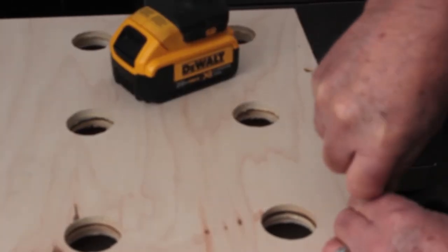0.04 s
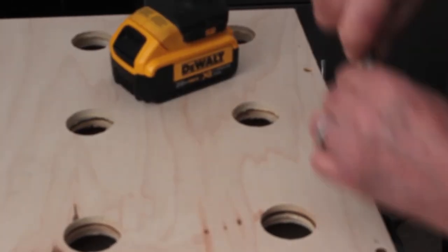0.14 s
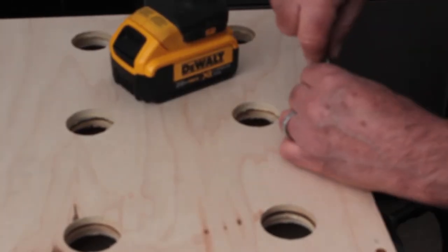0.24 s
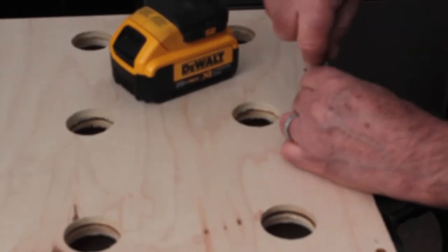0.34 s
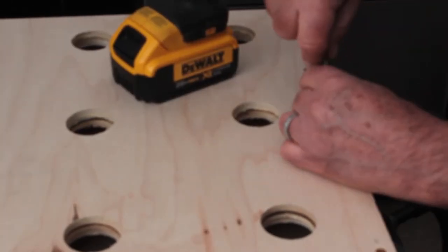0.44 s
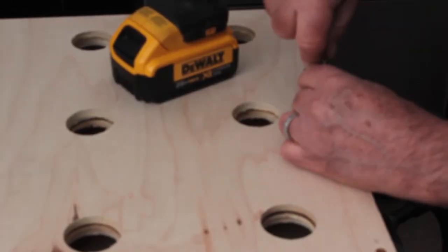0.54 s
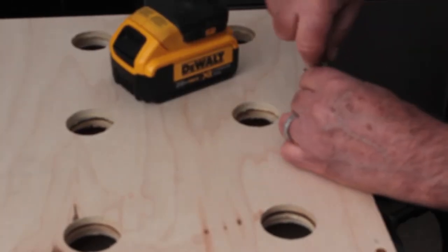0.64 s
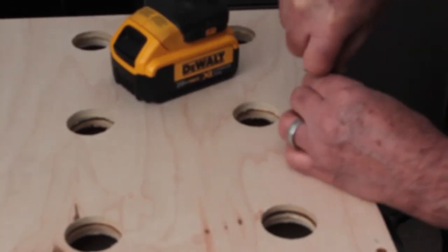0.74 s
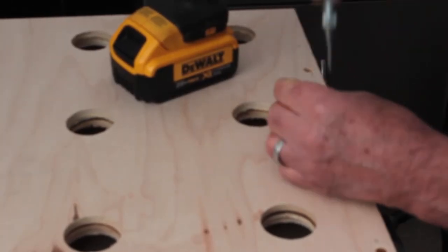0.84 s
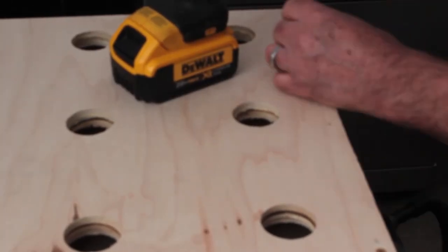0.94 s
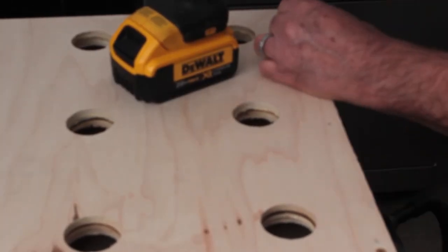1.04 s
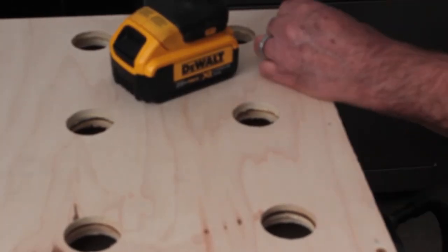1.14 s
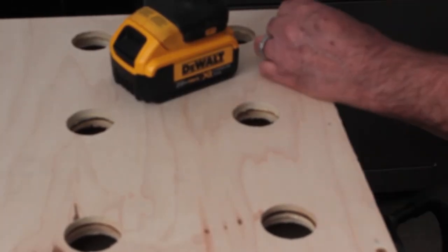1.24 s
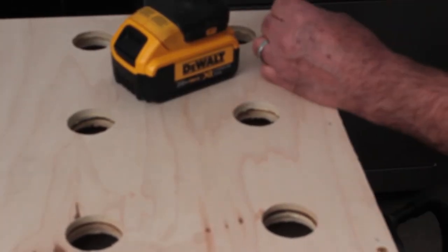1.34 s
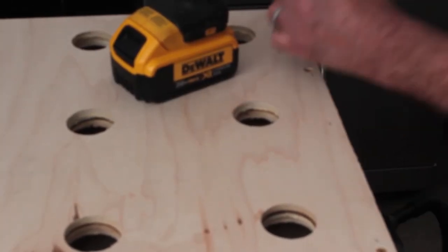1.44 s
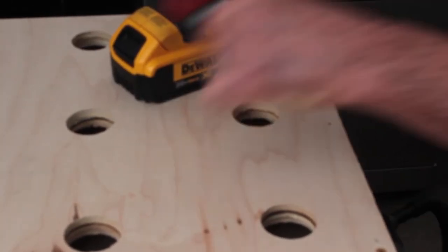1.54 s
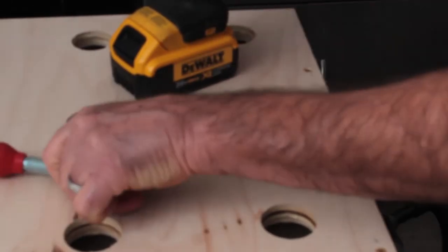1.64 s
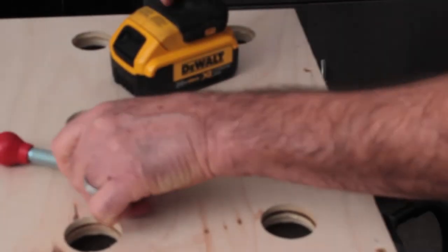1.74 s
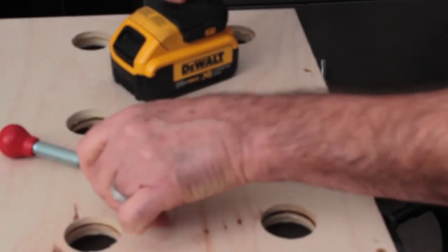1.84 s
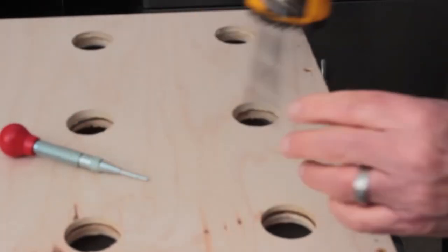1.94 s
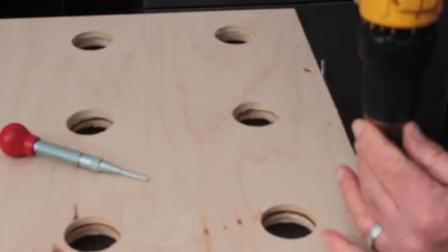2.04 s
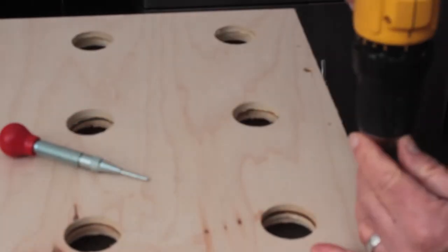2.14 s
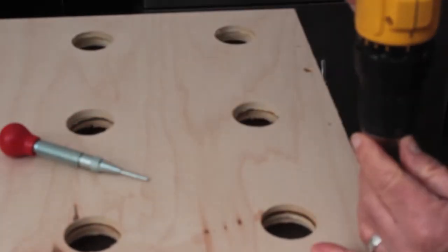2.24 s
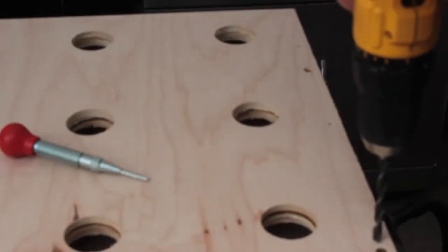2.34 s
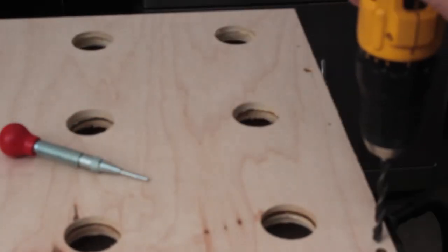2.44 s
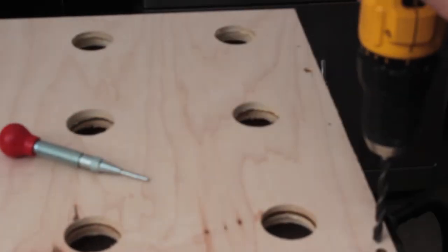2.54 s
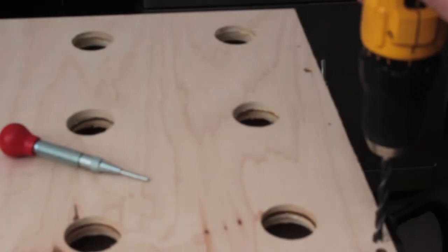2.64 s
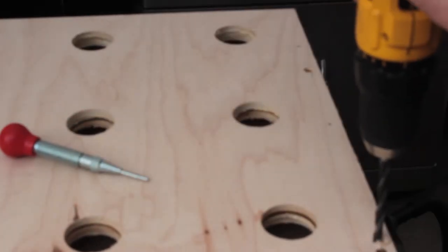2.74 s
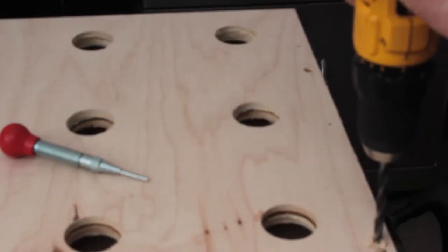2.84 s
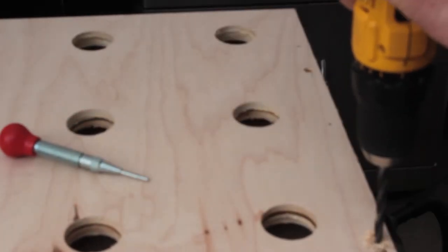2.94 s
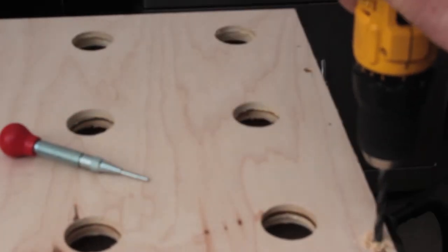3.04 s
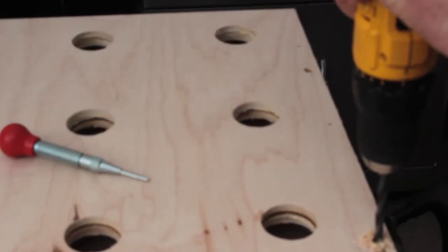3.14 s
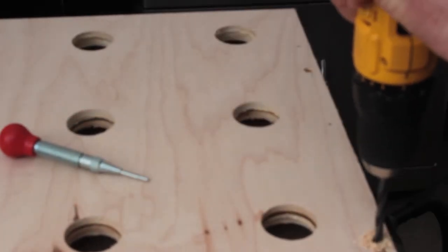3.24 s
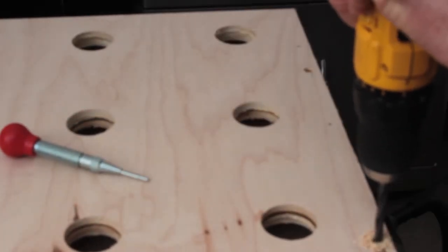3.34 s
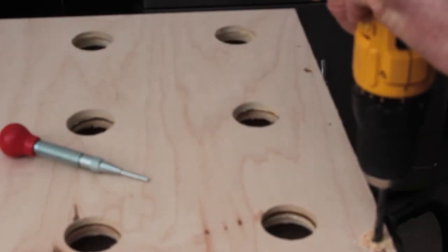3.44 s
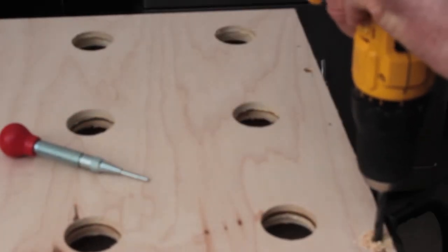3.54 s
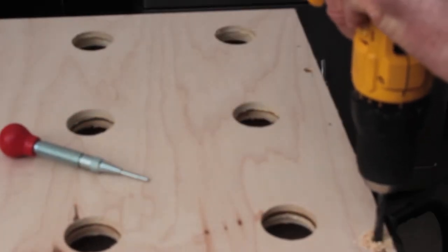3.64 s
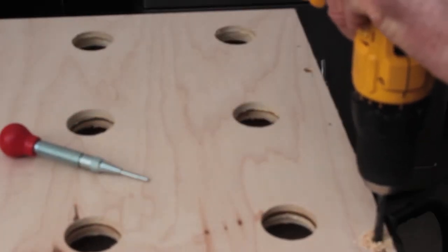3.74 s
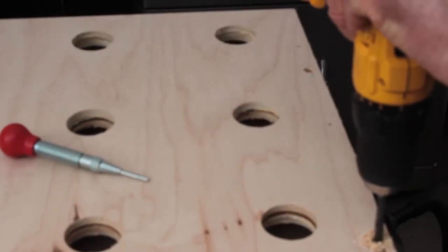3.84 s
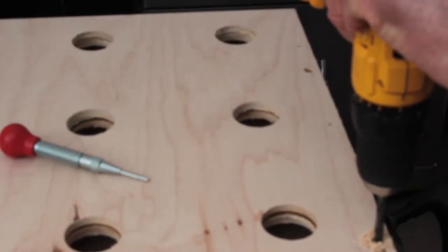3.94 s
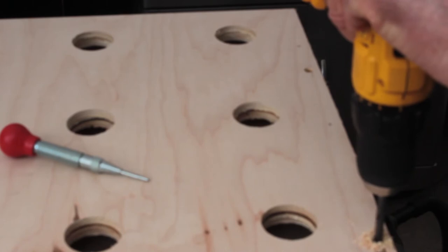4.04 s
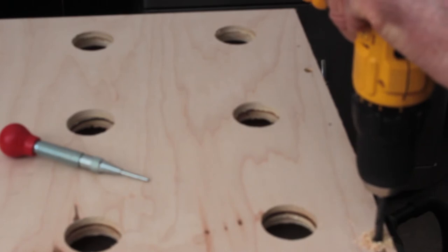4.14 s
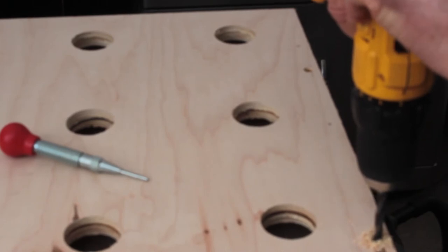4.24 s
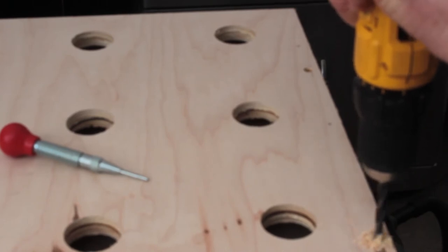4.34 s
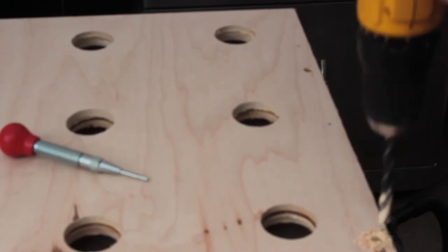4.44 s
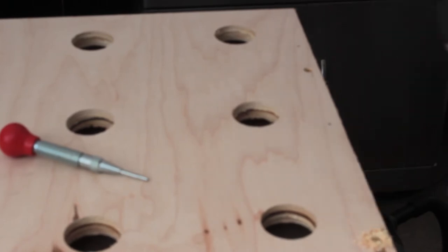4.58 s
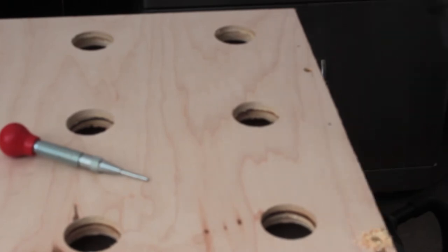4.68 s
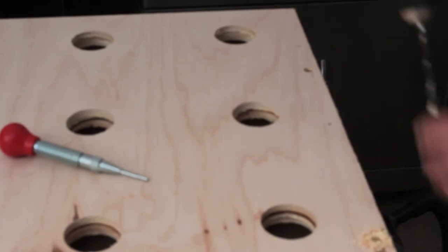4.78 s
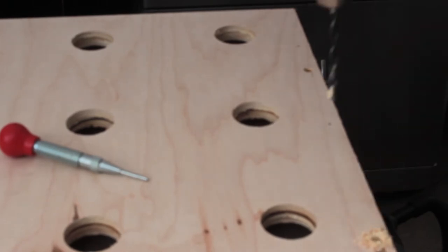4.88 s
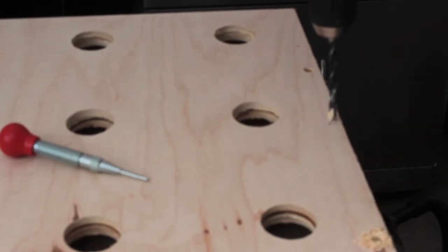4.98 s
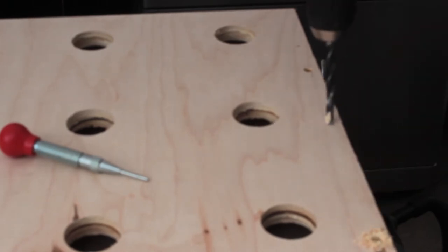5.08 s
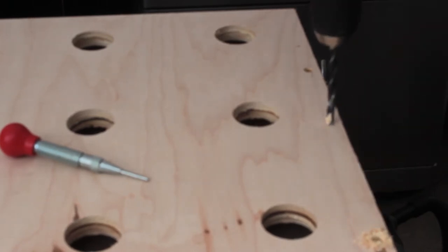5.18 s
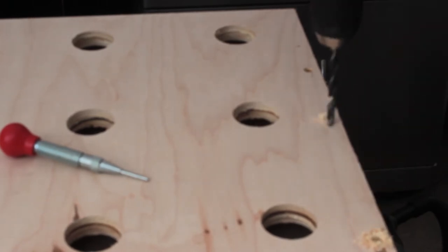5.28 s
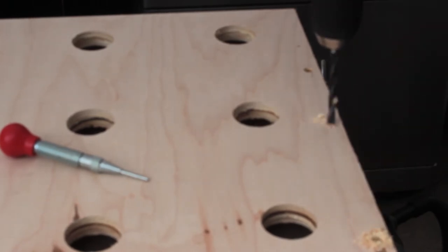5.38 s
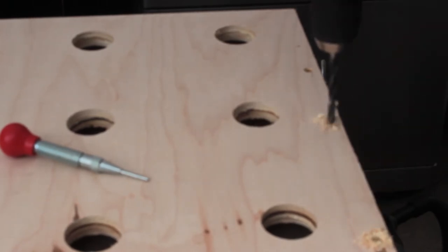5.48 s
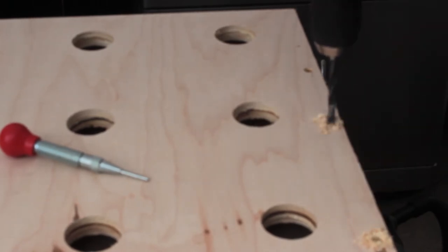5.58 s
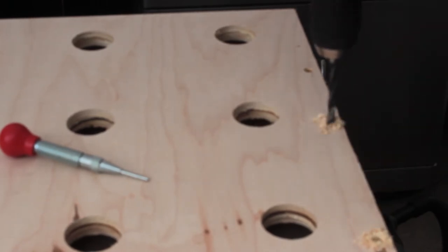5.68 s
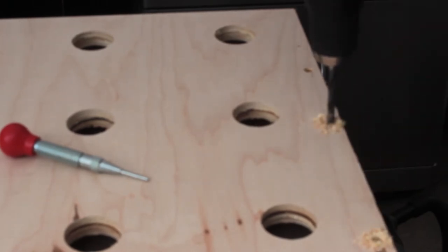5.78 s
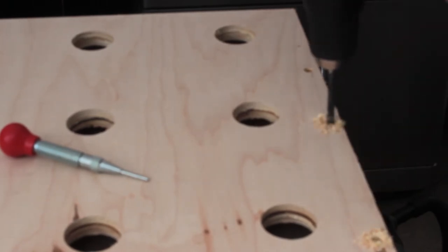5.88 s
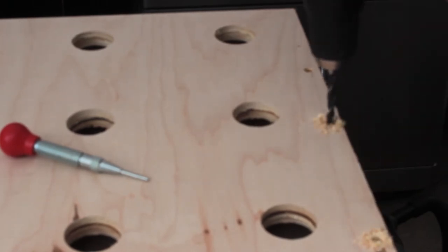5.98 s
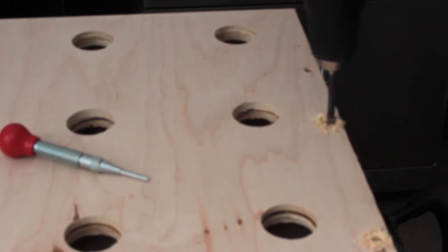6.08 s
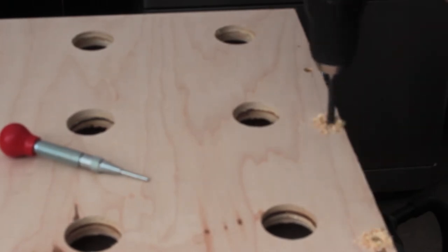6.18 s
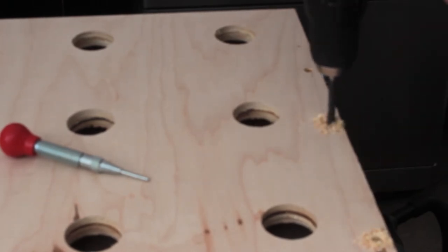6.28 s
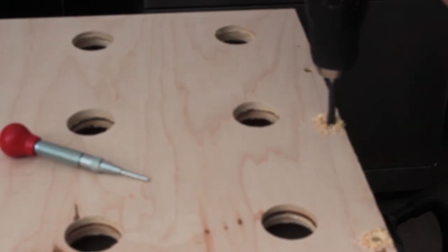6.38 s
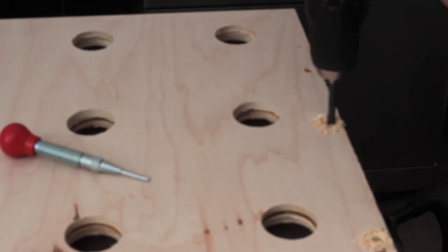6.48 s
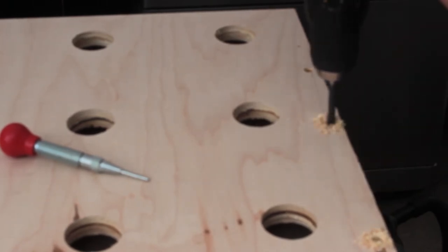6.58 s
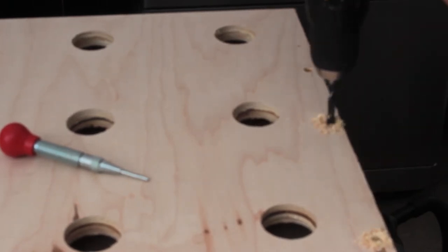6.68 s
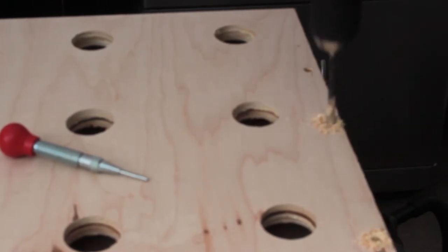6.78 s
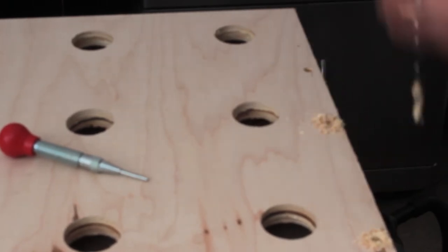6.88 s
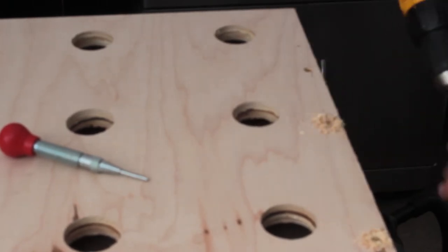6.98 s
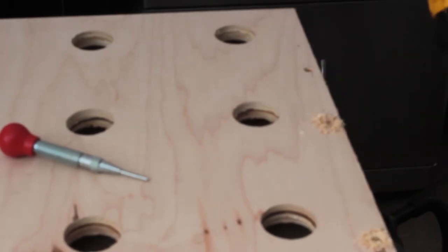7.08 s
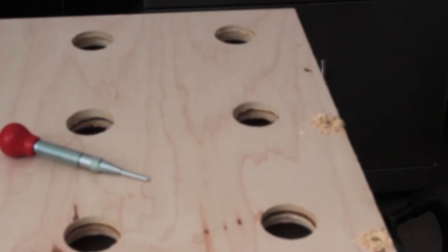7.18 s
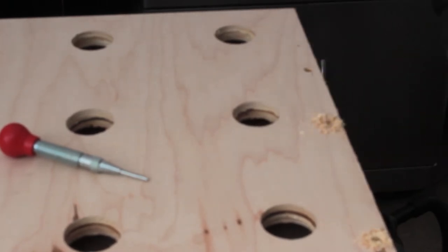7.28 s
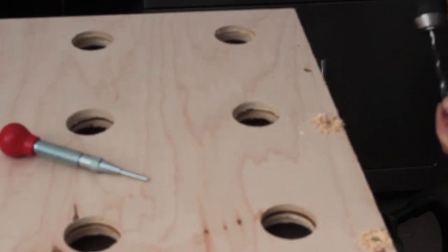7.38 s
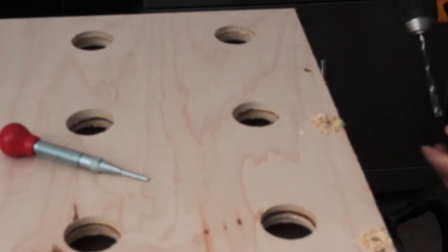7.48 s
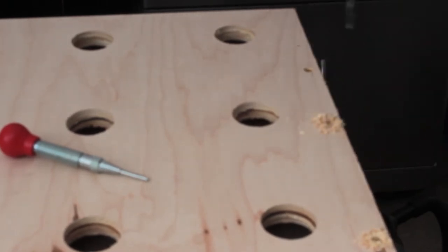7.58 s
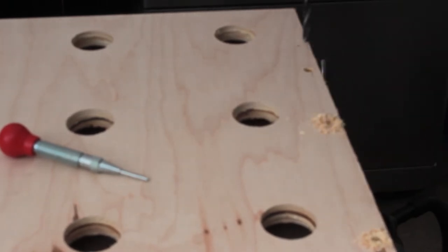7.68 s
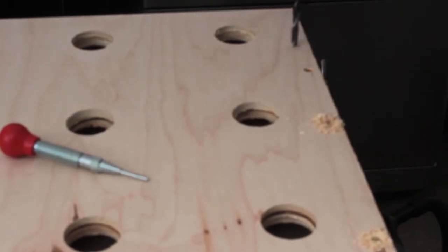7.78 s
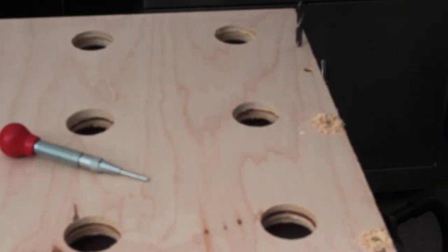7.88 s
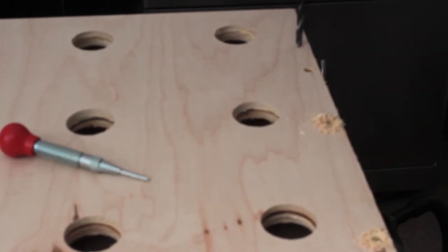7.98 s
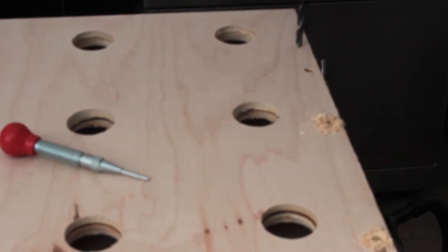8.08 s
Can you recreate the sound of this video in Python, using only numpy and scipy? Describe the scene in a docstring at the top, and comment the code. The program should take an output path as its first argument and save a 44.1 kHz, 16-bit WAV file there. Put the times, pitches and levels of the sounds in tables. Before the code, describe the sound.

A steel spring punch snaps sharply on a plywood panel at about 0.1, 0.8 and 1.4 seconds, briefly overloading the close mono microphone. Hands shuffle and the spring ticks in between, and a tool knocks down at 1.6 seconds, followed by tiny squeaks. At 2.6 seconds a cordless drill blips, then runs with an uneven whine that climbs high as the bit bites around 3.3 seconds, over growling gears and rasping wood. It winds down near 4.4 seconds with one more blip. After light rubbing and clicks, the drill bores again from 5.3 to 6 seconds and from 6.1 to 6.7, ending with a quick trigger tap. Soft sliding and small knocks continue until about 8 seconds. Underneath lies quiet workshop air and the faint hum of a distant machine slowly running down.

```python
"""In a workshop, a spring punch snaps on a plywood panel, hands shuffle, and a cordless drill bores in
short runs. The motor's commutator (its spinning contact) whines higher the faster it turns, over
growling gears and the noise of the cutting bit. Far off, another machine coasts down. The sharp snaps
overload a close mono microphone, and its limiter briefly turns the room down."""
import sys
import numpy as np
from scipy import signal
from scipy.fft import rfft, irfft, next_fast_len
from scipy.io import wavfile
from scipy.ndimage import uniform_filter1d

SR = 44100
rng = np.random.default_rng(int(sys.argv[2]) if len(sys.argv) > 2 else 0)


def persist_wave(psi):
    """Save psi, clipped to +-1, as 16-bit WAV."""
    counts = np.round(np.clip(psi, -1, 1) * 32767).astype(np.int16)
    wavfile.write(sys.argv[1], SR, np.atleast_2d(counts).T)


N = 358091

# Tone colours. Each row: frequency in Hz, relative level in dB.
ROOM_COLOUR = [(47, -57), (80, -37), (413, -8), (461, -4.5), (550, -4.5), (687, -0.5), (820, -4.5),
               (1070, -2.5), (4330, -9), (8050, -19), (15000, -24), (16000, -18.5)]  # the air of the shop
CRACK_COLOUR = [(180, -31), (300, -37.5), (2480, -2), (4370, -2), (6000, 0.5), (7820, -0.5), (8500, -2),
                (10900, -6), (14200, -2), (16000, 3.5)]  # struck steel
PANEL_COLOUR = [(115, -39), (150, -28), (200, -38.5), (500, -33.5), (850, -2.5), (1200, -2.5), (1500, -6.5),
                (2000, -14.5), (2700, -4.5), (3200, -17)]  # the plywood
CUTTING_COLOUR = [(180, -79), (300, -28), (440, -86), (519, -22), (870, -12), (961, -8.5), (2100, -8),
                  (2610, -7.5), (5250, -1), (7320, -4), (13300, 1), (14500, -1), (15500, -1),
                  (16000, -12.5)]  # the bit in the wood
SHELL_COLOUR = [(2000, -25), (4000, -34.5), (6000, -11.5), (8000, -11), (11500, -1.5), (15500, -2)]  # how the drill's shell gives off the whine
PINION_COLOUR = [(1500, -17), (2200, -11), (2700, -19), (3300, -27), (4200, -16), (4900, -12), (5500, -23)]  # how the case gives off the small motor gear's tone
RUB_COLOUR = [(300, -29.5), (800, 4.5), (1800, -1), (3000, -1.5), (5500, -3), (8000, -18.5)]
HISS_COLOUR = [(5000, -18), (7500, -1.5), (11500, -4.5), (15500, -6.0)]

# The far machine slows. Each row: time in seconds, base pitch in Hz.
COAST_SPEED = [(0, 234.3), (1.5, 229.1), (4.598, 218.5), (8.12, 200.9)]
# Its hum. Each row: multiple of the base pitch, level in dB.
COAST_TONES = [(2, -65), (3, -54), (4, -66), (5, -66), (6, -58), (8, -58), (9, -56), (10, -65), (12, -62)]
# Hands and tools slide. Each row: start, rise and fall in seconds, body and hiss levels in dB,
# hiss centre in Hz, steel ring in dB compared with the body.
RUB_STROKES = [(0.0, .003, 0.042, -37.5, -29, 9450, -2), (0.019, 0.076, 0.017, -51, -37, 11400, -12),
               (0.2, .1, .035, -38, -27, 9200, -2), (0.6, 0.027, .1, -45.5, -49, 7200, 6.5),
               (0.7, 0.056, 0.052, -40, -33, 8400, 6.5), (0.95, 0.029, 0.17, -37.5, -29, 11200, -28),
               (1.275, 0.11, .01, -38.5, -29.5, 10300, -19), (1.529, .06, 0.13, -41.5, -35.5, 11600, -14),
               (1.87, 0.039, 0.2, -43, -58, 7600, -5), (2.301, .19, 0.02, -64, -39, 9400, -8),
               (4.33, 0.05, 0.044, -40, -34, 8960, -12), (4.5, 0.023, 0.24, -45.5, -42, 8670, -24),
               (4.7, 0.17, 0.18, -48.5, -48, 10100, -18), (5.0, 0.21, 0.11, -50, -49, 8700, -7),
               (5.35, 0.036, .02, -37.5, -64, 9000, -7), (6.69, 0.031, 0.047, -40, -45, 9040, -14),
               (6.87, 0.14, 0.23, -35.5, -34, 10930, -29), (7.1, 0.22, 0.45, -43, -46, 9500, -20),
               (7.44, 0.042, 0.019, -37, -26.5, 10700, -3), (7.449, 0.068, 0.67, -44.5, -52, 9300, -6),
               (7.95, 0.14, .1, -46, -48, 10200, -21)]
# Thin squeaks. Each row: start and length in seconds, first and last pitch in Hz, level in dB.
SQUEAK_GLIDES = [(0.96, 0.08, 1440, 1590, -43), (1.955, 0.034, 3480, 3500, -40),
                 (1.96, 0.045, 2500, 2470, -37), (1.96, 0.125, 2260, 2180, -43),
                 (2.095, 0.031, 2240, 2170, -41), (4.493, 0.21, 1330, 1395, -47),
                 (4.727, .23, 1278, 1417, -42.5), (7.26, 0.183, 1840, 1840, -49)]
# Tool, chuck, trigger and panel tick. Each row: start in seconds, level in dB, ring pitch in Hz,
# noise in dB compared with the ring.
SMALL_KNOCKS = [(0.051, -14, 5570, -1.5), (0.0723, -13.5, 12700, 2.5), (0.267, -18, 3970, -13),
                (0.2893, -9, 1834, 3.5), (0.2946, -11, 1860, 5.5), (0.381, -24, 4070, -2.5),
                (0.845, -13, 8420, 5), (0.854, -8, 11800, 13), (0.8669, -9, 6200, 14.5),
                (1.1508, -19.5, 2050, -6), (1.2268, -27, 1760, 1.5), (1.284, -24, 2000, 3.5),
                (1.337, -16, 1990, 2), (1.45, -22, 6120, 4), (1.4633, -16.5, 6700, 11.5),
                (1.4823, -15, 1970, 4), (1.905, -23.5, 2480, 0.5), (2.21, -34, 7550, 0),
                (2.28, -36, 7000, 2), (2.631, -33, 9050, 1), (2.646, -21, 5200, 10),
                (3.0651, -16, 5230, 12.5), (3.115, -14, 5220, 13), (4.4926, -17, 12200, 7.5),
                (5.0464, -16, 1058, -16), (5.1914, -35, 943, 15.5), (5.299, -22, 5714, 10),
                (5.4129, -4.5, 12200, -3.5), (5.529, -6, 6540, 2), (5.576, -2.5, 6170, 6),
                (5.74, -5, 6000, 5), (6.097, -1.5, 6094, -11), (6.7537, -22, 6830, 10.5),
                (6.983, -24, 1863, 6), (7.0682, -20, 1050, -8), (7.095, -18.5, 880, -10),
                (7.4673, -25, 6560, 8), (7.7877, -22, 1000, -16), (7.841, -18.5, 2310, -10),
                (7.842, -10, 1060, -18), (7.9369, -19.5, 2000, -11), (7.9537, -21, 1960, -14)]
# The punch's steel rings. Each row: pitch in Hz, width in Hz, level in dB.
PUNCH_RINGS = [(2210, 330, -2.5), (3000, 640, -5.5), (4245, 780, -6), (6220, 700, -6.5),
               (7100, 1100, -10.5)]
# Its spring slips. Each row: start in seconds, number of slips, gap in seconds, first and last level in dB.
SPRING_PRESSES = [(0.713, 6, .0134, -25.5, -15), (1.298, 6, .0152, -41, -27.5)]
# The punch fires and the tool is put down. Each row: start in seconds, level in dB, seconds for the crack
# to fade by 60 dB, thud in dB, ring pitch in Hz, panel in dB. Thud and panel are compared with the crack.
SNAP_HITS = [(0.106, 8, 0.013, -61, 13100, -34), (0.802, 12, 0.012, -17.5, 8500, -9.5),
             (1.404, 7.5, 0.017, -11, 9800, -23), (1.639, -1, 0.023, -10.5, 5800, -6.5),
             (1.656, -1.5, 0.025, -16, 5900, -2.5), (6.849, -13, 0.029, -19, 11480, -46)]

# Short trigger taps. Each row: start, rise and fall in seconds, top whine pitch in Hz,
# then whine, cutting and growl levels in dB.
TRIGGER_TAPS = [(2.632, 0.038, 0.036, 6400, -18.5, -27.5, -32),
                (4.386, .044, 0.068, 6760, -24.5, -32.5, -43), (5.29, .028, .035, 7937, -32, -27.5, -38),
                (6.75, 0.047, 0.068, 7800, -26, -29, -35)]
# One list for each long trigger pull. Each row: time in seconds, whine pitch in Hz, whine level in dB.
LONG_PULLS = [
    [(2.766, 4150, -36), (2.828, 5347, -19), (2.872, 3950, -13), (2.915, 5610, -19), (2.965, 4120, -14),
     (2.991, 4920, -11), (2.999, 6180, -23), (3.045, 8690, -15), (3.075, 7920, -20), (3.105, 8170, -26),
     (3.2, 7060, -23), (3.27, 8400, -24.5), (3.36, 12340, -13.5), (3.392, 10230, -12), (3.45, 10860, -14),
     (3.58, 11480, -15), (3.78, 12240, -17.5), (3.96, 12720, -24), (4.09, 12620, -26), (4.16, 12830, -24),
     (4.225, 12750, -30), (4.255, 11940, -27), (4.3, 6270, -22), (4.336, 3074, -26), (4.368, 1980, -32)],
    [(5.396, 4453, -47), (5.444, 7430, -18), (5.49, 8200, -17.5), (5.531, 6710, -10), (5.575, 8820, -22),
     (5.603, 6100, -23), (5.665, 8840, -20), (5.741, 7470, -14.5), (5.755, 9680, -18), (5.792, 11800, -6.5),
     (5.817, 10520, -13), (5.93, 13000, -25), (5.954, 9730, -29), (5.974, 7490, -61)],
    [(6.076, 8090, -63), (6.104, 10460, -18), (6.118, 12360, -21), (6.132, 13390, -26),
     (6.18, 14500, -22.5), (6.383, 14890, -21), (6.45, 14740, -16.5), (6.495, 14420, -19),
     (6.589, 15200, -18), (6.69, 15000, -19.5), (6.707, 9960, -27), (6.725, 6364, -66)],
]
# The load on the bit, one list for each long pull. Each row: time in seconds, cutting and growl in dB.
BIT_LOADS = [
    [(2.765, -50, -57), (2.779, -31, -41), (3.035, -28.5, -35), (3.316, -29.5, -37.5), (3.418, -23.5, -29),
     (3.6, -28, -32), (4.22, -31.5, -40.5), (4.292, -32, -42.5), (4.37, -45, -49)],
    [(5.4, -42, -48), (5.412, -25.5, -49), (5.461, -23, -47), (5.6, -25.5, -43.5), (5.81, -20.5, -45),
     (5.825, -17, -26.5), (5.942, -22, -25), (5.975, -56, -51)],
    [(6.075, -69, -41), (6.099, -18.5, -31), (6.255, -26.5, -32.5), (6.465, -25.5, -35.5),
     (6.699, -25.5, -33), (6.725, -57, -52)],
]
# The holes. Each row, in seconds: drill in place, bit bites, how long the gears take to settle, bit lets go;
# then housing ring in Hz; then, in dB: that ring with loose gears and with meshed gears,
# the lower ring before the bite, knock depth before the bite.
DRILLED_HOLES = [(2.6, 3.303, 0.21, 4.27, 5370, -6.5, -4.5, -36, 9),
                 (5.25, 5.82, 0.37, 6.4, 6105, -8, 5, -11, 8.5),
                 (6.0, 6.092, 0.092, 6.69, 5940, -8, -10.5, -19, 9)]
# Tones of the meshing gear teeth. Each entry: a multiple of the whine pitch.
TOOTH_RATIOS = [.9168, .21, .416, .458, .622, .8125, .954, .98, 1.021, 1.1455]
# Each entry: the matching tone's relative level in dB.
TOOTH_DB = [-30.5, -45, -43, -47, -48, -45, -43, -42, -42, -39]
# The gear case rings. Each row: pitch in Hz, width in Hz, level in dB compared with the cutting level.
GEARBOX_RINGS = [(2116, 300, -19.5), (3187, 450, -21.5)]

WHINE_PER_GEAR, PINION_RATIO = 100, .3818  # whine cycles in one gear turn; pinion pitch over whine pitch
LOOSE_MESH, BITE_S, LET_GO_S = 0.079, 0.0317, 0.0417  # mesh is 1 when the gears are fully engaged
# In the first hole the bit catches at even steps: the speed drops by a small share and climbs back.
CATCH_FIRST_S, CATCH_EVERY_S, CATCH_LAST_S, CATCH_DROP, CATCH_RECOVER_S = 3.583, .2075, 4.25, .03, .06
TICK_FADE_S, SLIP_FADE_S = 0.032, 0.037  # time to fade by 60 dB
ROOM_DB, FAN_DB, LIMIT_DB, TREBLE_EDGE_HZ = -46, -13, -19, 15800


def gain_of(db):
    """Turns decibels into a factor to multiply by."""
    return 10 ** (np.asarray(db) / 20)


def evened(x):
    """Scales a signal to an average power of 1."""
    return x / np.sqrt(np.mean(x ** 2) + 1e-20)


def add(mix, s, sound):
    """Mixes a sound in at s seconds."""
    part = mix[round(s * SR):][:len(sound)]
    part += sound[:len(part)]


def gain_at(colour, hz):
    """Looks up how strong a tone colour is at hz."""
    f, db = np.transpose(colour)
    return gain_of(np.interp(np.log(hz + 1), np.log(f + 1), db))


def coloured(x, colour):
    """Gives x a tone colour, at an average power of 1."""
    size = next_fast_len(len(x))
    return evened(irfft(rfft(x, size) * gain_at(colour, np.fft.rfftfreq(size, 1 / SR)), size)[:len(x)])


def ring(x, hz, width):
    """Makes x ring by keeping a band around hz, at an average power of 1."""
    turn = np.exp(2j * np.pi * np.cumsum(hz * np.ones(len(x))) / SR)
    r = np.exp(-np.pi * width / SR)
    return evened((turn * signal.lfilter([(1 - r) ** 2], [1, -2 * r, r * r], x / turn)).real)


def ring_all(x, rings):
    """Makes x ring at all of an object's own pitches."""
    return sum(gain_of(db) * ring(x, hz, width) for hz, width, db in rings)


def wander(count, s):
    """A random drift, about 1 in size, that changes over about s seconds."""
    span = max(int(s * SR), 1)
    return evened(uniform_filter1d(uniform_filter1d(rng.standard_normal(count), span), span))


def level_curve(runs, column):
    """Joins the dB values of one column into a curve, silent (-120 dB) between runs."""
    out = np.full(N, -120.)
    for rows in runs:
        columns = np.transpose(rows)
        t = np.arange(columns[0][0], columns[0][-1], 1 / SR)
        start = round(t[0] * SR)
        out[start:start + len(t)] = np.interp(t, columns[0], columns[column])
    return out


def shop():
    """Room noise and the wavering hum of a far machine running down."""
    turns = np.cumsum(np.interp(np.arange(N) / SR, *np.transpose(COAST_SPEED))) / SR
    hum = sum(gain_of(db + 1.43 * wander(N, 0.063)) * np.sin(2 * np.pi * (k * turns + rng.random()))
              for k, db in COAST_TONES)
    air = gain_of(ROOM_DB + 2.0 * wander(N, 0.051)) * coloured(rng.standard_normal(N), ROOM_COLOUR)
    return np.sqrt(2) * hum + air


def hands():
    """Grainy rubbing sounds the wood, rings the steel punch and makes skin hiss."""
    out = np.zeros(N)
    for s, rise, fall, body_db, hiss_db, hz, ring_db in RUB_STROKES:
        t = np.arange(0, rise + fall, 1 / SR)
        stroke_db = np.interp(t, [0, rise, rise + fall], [-11.5, 0, -17])
        grit = gain_of(2.4 * wander(len(t), 0.0054)) * rng.standard_normal(len(t))
        body = coloured(grit, RUB_COLOUR) + gain_of(ring_db) * ring_all(grit, PUNCH_RINGS)
        hiss = 0.45 * coloured(grit, HISS_COLOUR) + 0.24 * ring(grit, hz, 2900)
        rub = gain_of(body_db + stroke_db) * body + gain_of(hiss_db + 1.7 * stroke_db) * hiss
        add(out, s, rub * np.clip(np.minimum(t, t[-1] - t) / 0.0021, 0, 1))
    return out


def squeaks():
    """Rubbing gives thin tones that glide and flutter."""
    out = np.zeros(N)
    for s, length, from_hz, to_hz, db in SQUEAK_GLIDES:
        hz = np.linspace(from_hz, to_hz, round(length * SR))
        tone = np.sin(2 * np.pi * np.cumsum(hz) / SR) * signal.windows.tukey(len(hz), .3)
        add(out, s, gain_of(db + 4 * wander(len(hz), 0.0038)) * tone)
    return out


def ticks():
    """Each small knock is a burst of noise with one ringing tone."""
    out, t = np.zeros(N), np.arange(2500) / SR
    shape = (1 - np.exp(-t / 0.00029)) * gain_of(-60 * t / TICK_FADE_S)
    for s, db, hz, noise_db in SMALL_KNOCKS:
        noise = rng.standard_normal(len(t))
        tone = .6 * (np.sin(2 * np.pi * hz * t) + ring(noise, hz, .33 * hz))
        burst = gain_of(noise_db) * coloured(noise, CRACK_COLOUR) + tone
        add(out, s, gain_of(db - 8.5) * shape * burst)
    return out


def spring_slips():
    """As the punch is pressed, its spring slips coil by coil and rings the steel."""
    out, t = np.zeros(N), np.arange(2500) / SR
    shape = (1 - np.exp(-t / 0.00029)) * gain_of(-60 * t / SLIP_FADE_S)
    for s, slips, gap, first_db, last_db in SPRING_PRESSES:
        for k, db in enumerate(np.linspace(first_db, last_db, round(slips))):
            noise = rng.standard_normal(len(t))
            burst = evened(ring_all(noise, PUNCH_RINGS)) + gain_of(-6) * coloured(noise, CRACK_COLOUR)
            start = s + k * gap + 0.0022 * rng.standard_normal() * (k > 0)
            add(out, start, gain_of(db + 2 * rng.standard_normal()) * shape * burst)
    return out


def snaps():
    """Steel strikes: a crack, a quick noisy ring, the body of the panel and a low thud."""
    out, t = np.zeros(N), np.arange(4000) / SR
    for s, db, fade_s, thud_db, hz, panel_db in SNAP_HITS:
        noise = rng.standard_normal(len(t))
        crack = coloured(noise, CRACK_COLOUR) + 0.64 * ring(noise, hz, 2700)
        panel = gain_of(panel_db) * coloured(noise, PANEL_COLOUR)
        tail = gain_of(-24 - 60 * t / 0.085)
        shape = (1 - np.exp(-t / 0.00071)) * (gain_of(-60 * t / fade_s) + tail)
        thud = gain_of(thud_db) * np.exp(-t / 0.00048) * t / 0.00034
        add(out, s, gain_of(db) * ((crack + panel) * shape + thud))
    return out


def trigger_tap(s, rise, fall, top_hz, whine_db, cut_db, growl_db):
    """The motor speeds up and drops back. Gives rows like those of LONG_PULLS and BIT_LOADS."""
    step = np.array([-1, -.6, -.3, 0, .3, .6, 1])  # 0 is the moment of top speed
    t = s + rise + step * np.where(step < 0, rise, fall)
    fade_db = abs(step) ** 3 * np.where(step < 0, -20.5, -34.5)
    hz = top_hz * (1 - abs(step) ** 1.4 * np.where(step < 0, .45, .4))
    pull = np.transpose([t, hz, whine_db + fade_db])
    return pull, np.transpose([t, cut_db + fade_db, growl_db + fade_db])


def motor_speed(t, pulls, biting):
    """The whine pitch in Hz: unsteady until the bit bites, and dipping when the bit catches."""
    times, speeds, _ = np.concatenate(pulls).T
    hz = uniform_filter1d(np.interp(t, times, speeds), 400)
    hz *= 1 + .009 * (2 - 1.7 * biting) * wander(N, 0.022)
    since_catch = (t - CATCH_FIRST_S) % CATCH_EVERY_S
    catches = np.exp(-since_catch / CATCH_RECOVER_S) * (t > CATCH_FIRST_S) * (t < CATCH_LAST_S)
    return hz * (1 - CATCH_DROP * uniform_filter1d(catches, 200))


def motor_tones(hz, tremble, whine, cut, mesh):
    """The commutator, the small motor gear (pinion) and the gear teeth sing in step with the motor."""
    turns = np.cumsum(hz * (1 + tremble * wander(N, .003))) / SR

    def tone(k):
        """A flickering tone at k times the whine pitch, faded out near 17 kHz."""
        audible = np.clip((SR / 2 - 5000 - k * hz) / 500, 0, 1)
        flicker = gain_of((5.5 - 3 * mesh ** .3) * wander(N, .008))
        return np.sqrt(2) * audible * flicker * np.sin(2 * np.pi * k * turns)

    commutator = sum(gain_at(SHELL_COLOUR, k * hz) * tone(k) / k ** .65 for k in (1, 2, 3))
    pinion = gain_at(PINION_COLOUR, PINION_RATIO * hz) * tone(PINION_RATIO)
    teeth = sum(gain_of(db) * tone(k) for k, db in zip(TOOTH_RATIOS, TOOTH_DB))
    return whine * commutator + cut * pinion + mesh * teeth


def gear_hum(hz, gear_turns):
    """The gears shake the panel at whole multiples of their turning rate."""
    hum = np.zeros(N)
    for k in range(1, 25):
        level = min(1, (10 / k) ** 1.4) * gain_at(PANEL_COLOUR, k * hz / WHINE_PER_GEAR)
        sway = gain_of(3 * wander(N, .04))
        hum += sway * level * np.sin(2 * np.pi * (k * gear_turns + rng.random()))
    return hum


def gear_knocks(gear_turns):
    """One knock of uneven strength in every gear turn, as a curve that jumps and falls."""
    strength = rng.uniform(.2, 1.4, 1500)[gear_turns.astype(int) % 1500]
    return strength * np.exp(-(gear_turns % 1) / 0.26) - .3


def cutting_noise(chips, knocks, ring_hz, ring_db, lower_db):
    """Breaking chips, pulsed by the knocks, hiss and ring the housing and the gear case."""
    knocked = knocks * chips
    housing = gain_of(ring_db) * knocks * ring(chips, ring_hz, 1000)
    lower_ring = gain_of(lower_db) * ring(knocked, hz=4130, width=800)
    hiss = gain_of(3) * coloured(knocked, CUTTING_COLOUR)
    return hiss + housing + lower_ring + ring_all(knocked, GEARBOX_RINGS)


def drill():
    """Whine, fan, gear growl and knocking cutting noise all follow the motor's speed."""
    t = np.arange(N) / SR
    tap_pulls, tap_loads = zip(*[trigger_tap(*row) for row in TRIGGER_TAPS])
    pulls = sorted(LONG_PULLS + list(tap_pulls), key=lambda rows: rows[0][0])
    loads = BIT_LOADS + list(tap_loads)
    levels_db = [level_curve(pulls, 2), level_curve(loads, 1), level_curve(loads, 2)]
    whine, cut, growl = uniform_filter1d(gain_of(levels_db), 150)
    running = uniform_filter1d((levels_db[0] > -100) * 1., 150)

    # In each hole the bit bites quickly, and the loose gears settle into mesh more slowly.
    hole = np.maximum(np.searchsorted(np.transpose(DRILLED_HOLES)[0], t) - 1, 0)
    settings = np.array(DRILLED_HOLES)[hole].T
    _, bite, settle, let_go, ring_hz, loose_db, meshed_db, lower_db, knock_db = settings
    held = np.clip(1 - (t - let_go) / LET_GO_S, 0, 1)
    biting = held * np.clip((t - bite) / BITE_S, 0, 1)
    meshed = held * (1 - np.exp(-np.maximum(t - bite, 0) / settle))
    mesh = running * np.clip(LOOSE_MESH + (1 - LOOSE_MESH) * meshed, 0, 1)
    ring_db = loose_db + (meshed_db - loose_db) * meshed
    lower_db = lower_db * (1 - biting) - 33 * biting
    knock_db = knock_db * (1 - biting) + 4.5 * biting

    hz = motor_speed(t, pulls, biting)
    tremble = .015 - .0115 * biting - .002 * meshed  # the speed trembles most while the gears are loose
    tones = motor_tones(hz, tremble, whine, cut, mesh)
    gear_turns = np.cumsum(uniform_filter1d(hz, 2500)) / SR / WHINE_PER_GEAR
    hum = .8 * mesh * gear_hum(hz, gear_turns)
    knocks = gain_of(knock_db * gear_knocks(gear_turns))
    # Chips break off at random, so the noise is grainy.
    chips = gain_of(0.97 * wander(N, 0.0012) + 0.64 * wander(N, 0.0092)) * rng.standard_normal(N)
    rattle = np.sqrt(1 - .85 * mesh ** 2) * coloured(knocks * chips, PANEL_COLOUR)
    fan = gain_at(SHELL_COLOUR, hz) * ring(chips, np.minimum(hz, 15500), 2600)  # air round the whine
    cutting = cutting_noise(chips, knocks, ring_hz, ring_db, lower_db)
    return tones + gain_of(FAN_DB) * whine * fan + cut * cutting + growl * (hum + rattle)


def scene():
    """Everything reaches one microphone, so both channels are the same."""
    return np.tile(drill() + snaps() + ticks() + spring_slips() + hands() + squeaks() + shop(), (2, 1))


def record(dry):
    """The limiter turns loud sound down a moment late, so snaps distort and the room then dips."""
    power_db = 10 * np.log10(signal.lfilter([1 / 80], [1, 1 / 80 - 1], dry[0] ** 2) + 1e-12)
    fall = np.arange(N) * 94.0 / SR  # a held peak sinks by 94 dB a second
    held_db = np.maximum.accumulate(power_db + fall) - fall
    late_db = signal.lfilter([1 / 300], [1, 1 / 300 - 1], np.maximum(held_db - LIMIT_DB, 0))
    thin = signal.lfilter(*signal.butter(1, 120, "high", fs=SR), dry)  # a small microphone loses bass
    clipped = np.clip(thin / gain_of(0.72 * late_db), -1, 1)
    treble_cut = signal.firwin(511, TREBLE_EDGE_HZ, window=("kaiser", 9), fs=SR)
    return signal.oaconvolve(clipped, treble_cut[None], "same")


dry = scene()
out = record(dry)
persist_wave(out)
```